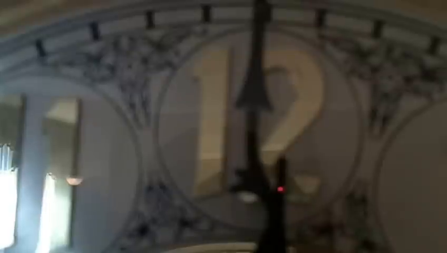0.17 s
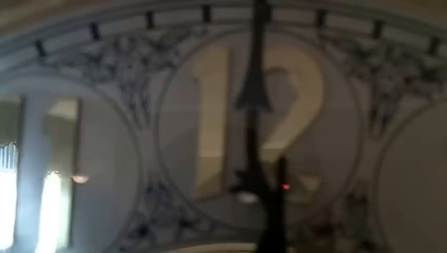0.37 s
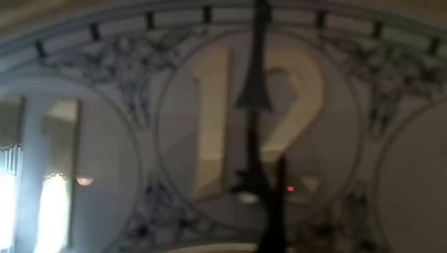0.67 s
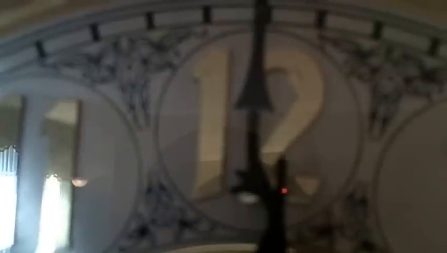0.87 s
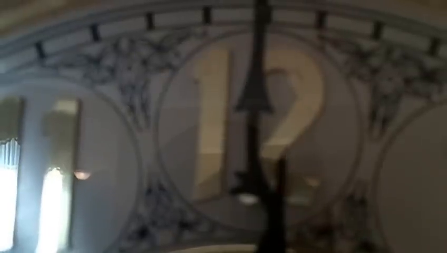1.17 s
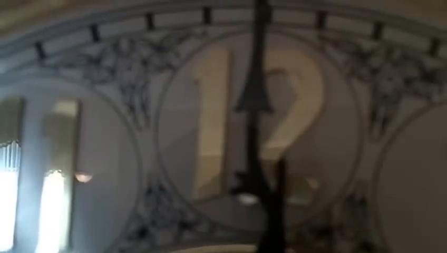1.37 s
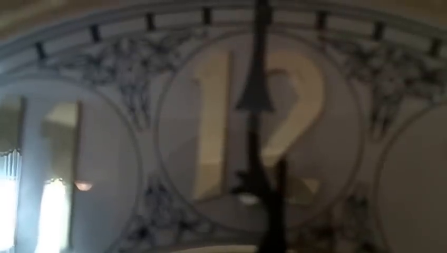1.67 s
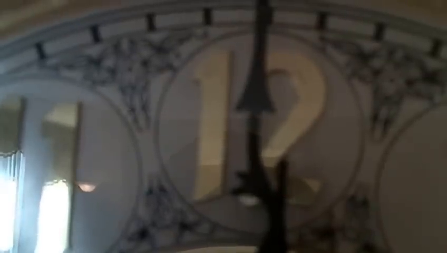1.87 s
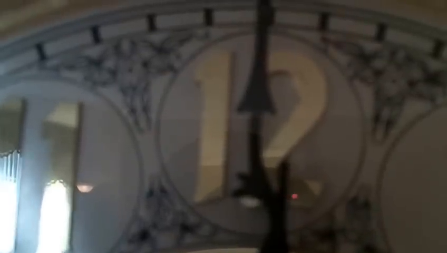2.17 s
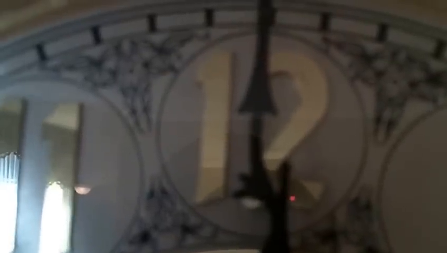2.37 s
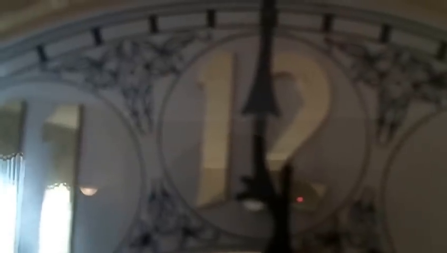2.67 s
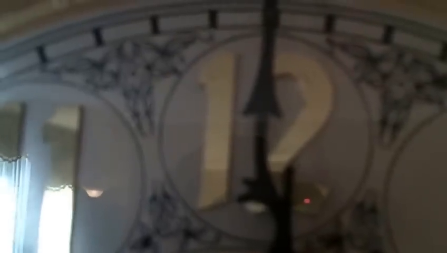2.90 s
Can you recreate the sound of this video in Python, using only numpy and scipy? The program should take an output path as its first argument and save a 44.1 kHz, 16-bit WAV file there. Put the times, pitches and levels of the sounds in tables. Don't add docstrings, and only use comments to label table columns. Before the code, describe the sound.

Three slow clock beats, each a tiny cluster of metallic clicks with a short wooden-case tail, in a quiet indoor room; a small close microphone adds hiss and a thin steady buzz.

```python
import sys
import numpy as np
from scipy import signal
from scipy.fft import rfft, irfft
from scipy.io import wavfile
from scipy.ndimage import uniform_filter1d

SR = 44100
rng = np.random.default_rng(int(sys.argv[2]) if len(sys.argv) > 2 else 0)


def magnitude_from_level(level_db):
    exponent = np.asarray(level_db, float) / 20
    return 10 ** exponent


def output_pcm(signal):
    pcm = np.clip(np.atleast_2d(signal).T, -1, 1) * 32767
    wavfile.write(sys.argv[1], SR, np.round(pcm).astype(np.int16))


N = 134064


def evened(x):
    return x / np.sqrt(np.mean(x ** 2) + 1e-20)


def read(points, hz):
    f, value = np.transpose(points)
    return np.interp(np.log(hz + 1), np.log(f + 1), value, left=-200, right=-200)


def drift(top_hz):
    t = np.arange(N) / SR
    curve = np.zeros(N)
    for f in np.geomspace(0.9, top_hz, num=12):
        curve += np.sin(2 * np.pi * (f * t + rng.random())) / np.sqrt(f)
    return evened(curve)


def air():
    # (frequency [Hz], density [dB per Hz])
    rumble = [(15, -63), (30, -62.5), (60, -71.5), (140, -79), (250, -81.5), (460, -76), (600, -84),
              (950, -95.5)]
    # (frequency [Hz], density [dB per Hz])
    room_air = [(950, -95), (1500, -99), (2400, -101), (3200, -103), (4200, -106), (4950, -107),
                (5030, -118), (6000, -135)]
    # (frequency [Hz], density [dB per Hz])
    hiss = [(4000, -122), (5200, -113), (6500, -117), (7600, -120), (8800, -120), (10300, -118),
            (12000, -117), (15300, -116)]
    hiss_trim_db, patch_db = -1, 0.7

    hz = np.fft.rfftfreq(N, 1 / SR)
    room_db = np.where(hz < rumble[-1][0], read(rumble, hz), read(room_air, hz))
    power_per_hz = magnitude_from_level(room_db) ** 2 + magnitude_from_level(read(hiss, hz) + hiss_trim_db) ** 2
    noise = irfft(rfft(rng.standard_normal(N)) * np.sqrt(power_per_hz * SR / 2), N)

    z = signal.stft(noise, nperseg=1024, noverlap=768)[2]
    patches = uniform_filter1d(rng.standard_normal(z.shape), size=10, axis=0)
    patches = uniform_filter1d(patches, size=10, axis=1)
    return signal.istft(z * magnitude_from_level(patch_db * evened(patches)), nperseg=1024, noverlap=768)[1][:N]


def hum():
    tone_hz = [29.6, 57, 120, 173.5, 267.8, 535.6, 4016.3, 4046.2, 4075.9, 9540]
    tone_db = [-50, -61.5, -49, -63, -61, -56, -92.5, -92.5, -85.5, -105]
    tone_wander_db = [2.5, 3.5, 1.2, 3.0, 2.2, 1.6, 1.5, 1.5, 1.5, 1.5]
    early_db, settle_s = 2.5, 0.58

    t = np.arange(N) / SR
    out = np.zeros(N)
    for hz, db, wander_db in zip(tone_hz, tone_db, tone_wander_db):
        level_db = db + wander_db * drift(7)
        if hz == tone_hz[5]:
            level_db = level_db + early_db * np.exp(-t / settle_s)
        phase = 2 * np.pi * (hz * t + rng.random()) + 0.17 * wander_db * drift(5)
        out += np.sqrt(2) * magnitude_from_level(level_db) * np.sin(phase)
    return out


def buzz():
    field_hz, carrier_hz, start_s = 59.94, 6743.25, 0.0547
    hold_s, level_db = 0.00073, -63
    ring_hz, ring_db, ring_t60_s = 6830, -6, 0.012

    t = np.arange(N) / SR - start_s
    since = t % (1 / field_hz)
    gate = np.clip(np.minimum(since, hold_s - since) * SR / 2 + 0.5, 0, 1)
    slide = 2 * np.pi * (ring_hz - carrier_hz) * since
    ring = magnitude_from_level(ring_db - 60 * since / ring_t60_s) * np.exp(1j * slide)
    return magnitude_from_level(level_db) * ((gate + ring) * np.exp(2j * np.pi * carrier_hz * t)).imag


def clatter(hits, modes):
    # (frequency [Hz], level [dB])
    rattle = [(700, -4), (1500, 0), (2400, 1), (3600, -8), (5100, -5), (5600, -18), (9500, -17),
              (15000, -22)]
    rattle_db, rattle_t60_s = -3.5, 0.052
    favour_db_per_oct, rise_s, longest_t60_s = 6, 0.001, 0.14
    split, side_share = 0.0135, 0.39

    t = np.arange(SR // 4) / SR
    out = np.zeros(N + SR)
    noise_hz = np.fft.rfftfreq(len(t), 1 / SR) + 1
    hz, db, t60_s = np.array(modes).T[:, :, None]
    decay_db = 60 * t / np.minimum(t60_s, longest_t60_s)
    up, down = split * np.sqrt(hz / 2000) * rng.uniform(0.68, 1.26, (2, len(modes), 1))
    rise = (1 - np.exp(-t / rise_s)) ** 2

    for s, level_db, near_hz in hits:
        a, b, c = rng.random((3, len(modes), 1))
        upper = np.sin(2 * np.pi * (hz * (1 + up) * t + b))
        lower = np.sin(2 * np.pi * (hz * (1 - down) * t + c))
        plates = np.sin(2 * np.pi * (hz * t + a)) + side_share * (upper + lower)
        mode_db = db - favour_db_per_oct * abs(np.log2(hz / near_hz))
        ring = (magnitude_from_level(mode_db - decay_db) * plates).sum(0)

        colour = magnitude_from_level(read(rattle, noise_hz) - favour_db_per_oct * abs(np.log2(noise_hz / near_hz)))
        loose = irfft(rfft(rng.standard_normal(len(t))) * colour, len(t))
        ring = ring + magnitude_from_level(rattle_db - 60 * t / rattle_t60_s) * loose * 4
        out[round(s * SR):][:len(t)] += magnitude_from_level(level_db) * ring * rise
    return out[:N]


def tick():
    # (time [s], level [dB], favoured pitch [Hz])
    tick_hits = [
        (.7392, -48.5, 3200),
        (.7420, -50, 4570),
        (.7490, -46.5, 2400),
        (.7540, -48, 2160),
        (.7610, -52.5, 2180),
        (.7690, -51.5, 2620),
    ]
    # (frequency [Hz], level [dB], t60 [s])
    tick_modes = [(1006, -5, 0.062), (1645, -8, 0.12), (1830, -7, .08), (1990, -3.5, 0.065),
                  (2127, -0.5, 0.076), (3105, 0.5, 0.053), (3410, -1.5, 0.06), (3806, -5, 0.055),
                  (4610, -6.5, 0.056), (4730, -7, 0.063), (5100, -7, 0.03), (6210, -13, .05),
                  (9560, -13, 0.044), (12300, -18, 0.039)]
    return clatter(tick_hits, tick_modes)


def tock():
    # (time [s], level [dB], favoured pitch [Hz])
    tock_hits = [
        (1.7185, -59.5, 3220),
        (1.7220, -50.5, 2230),
        (1.7290, -52, 2150),
        (1.7350, -56, 2200),
        (1.7450, -57.5, 1730),
    ]
    # (frequency [Hz], level [dB], t60 [s])
    tock_modes = [(1076, 2, 0.074), (1300, -6, 0.085), (1754, -3, 0.11), (1805, -10, 0.12), (1940, -10, .1),
                  (2150, 2.5, 0.087), (3220, -23, .05), (3770, -6, 0.046), (4050, -16, .06),
                  (4680, -8, .06), (9600, -28, .04)]
    return clatter(tock_hits, tock_modes)


def last_tick():
    # (time [s], level [dB], favoured pitch [Hz])
    last_hits = [
        (2.7385, -52, 3100),
        (2.7415, -49.5, 2050),
        (2.7475, -46, 4970),
        (2.7545, -50, 2490),
        (2.7630, -57, 2180),
        (2.7720, -52.5, 2180),
    ]
    # (frequency [Hz], level [dB], t60 [s])
    last_modes = [(1082, -6, .08), (1497, -13, 0.17), (1760, -9, 0.14), (2012, -2, .12),
                  (2132, -2.5, 0.071), (3160, 1.5, 0.045), (3420, -4, 0.068), (3647, -7, 0.061),
                  (4500, -18, 0.053), (4650, -9, 0.059), (4967, 3, 0.038), (6083, -9.5, 0.039),
                  (9900, -25, .03), (12300, -28, .04)]
    return clatter(last_hits, last_modes)


def case(x):
    t60_s, build_s, density = 0.38, 0.002, 0.08
    t = np.arange(SR // 3) / SR
    taps = rng.standard_normal(len(t)) * (rng.random(len(t)) < density)
    taps = taps * magnitude_from_level(-60 * t / t60_s) * np.minimum(t / build_s, 1)
    return signal.fftconvolve(x, taps / np.linalg.norm(taps))[:N]


def scene():
    case_db = -5.5
    floor = air() + hum() + buzz()
    clock = tick() + tock() + last_tick()
    return (floor + clock + magnitude_from_level(case_db) * case(clock))[None]


def notched(x):
    notch_hz = [2700, 5510, 7910, 10920]
    # (shoulder width [Hz], core width [Hz])
    notch_widths = [(1240, 15), (750, 140), (1760, 49), (1120, 22)]
    for hz, (shoulder_hz, core_hz) in zip(notch_hz, notch_widths):
        turn = np.cos(2 * np.pi * hz / SR)
        rz, rp = np.exp(-np.pi * core_hz / SR), np.exp(-np.pi * shoulder_hz / SR)
        zeros, poles = [1, -2 * rz * turn, rz ** 2], [1, -2 * rp * turn, rp ** 2]
        x = signal.lfilter(zeros, poles, x) * (rp / rz)
    return x


def opened(x):
    open_at, step_db, decay_s = 1599, -35, 0.0016
    since = np.maximum(np.arange(N) - open_at, 0) / SR
    fresh = np.exp(-since / decay_s)
    return (x * (1 - fresh) + magnitude_from_level(step_db) * fresh) * (np.arange(N) > open_at)


def band_limit(x):
    return signal.sosfilt(signal.butter(12, 16240, fs=SR, output="sos"), x)


def record(dry):
    lowpass = signal.firwin(511, 15330, window=("kaiser", 8), fs=SR)
    x = signal.oaconvolve(dry, lowpass[None], "same")
    mix = opened(notched(x))
    return band_limit(mix)


dry = scene()
out = record(dry)
output_pcm(out)
```